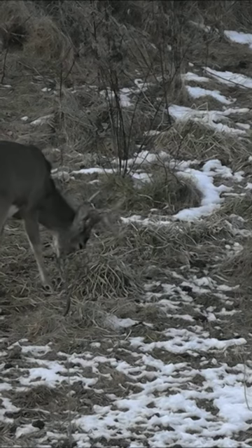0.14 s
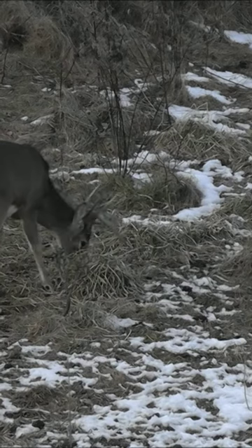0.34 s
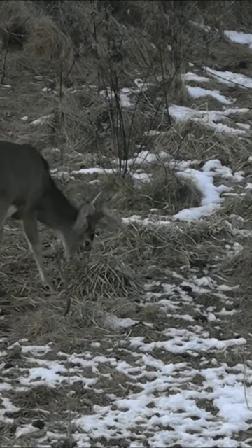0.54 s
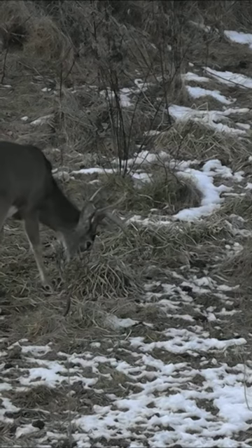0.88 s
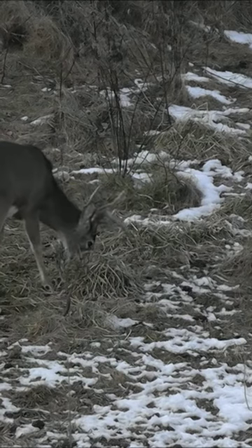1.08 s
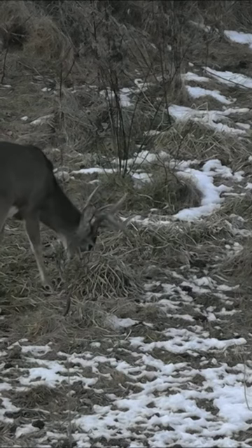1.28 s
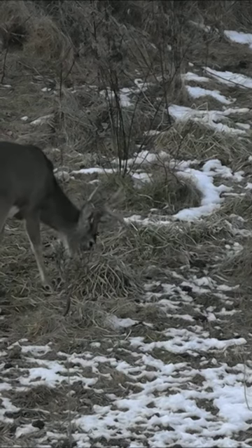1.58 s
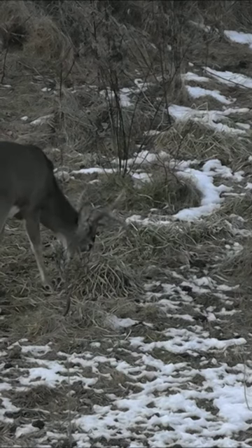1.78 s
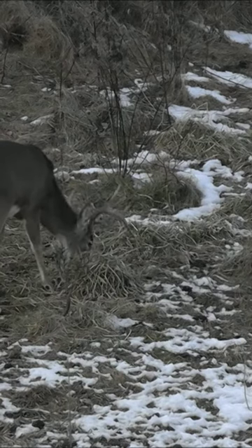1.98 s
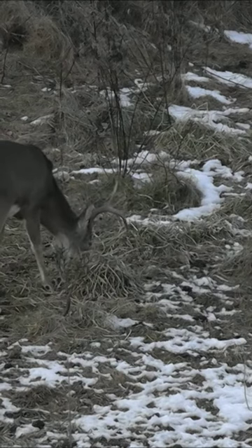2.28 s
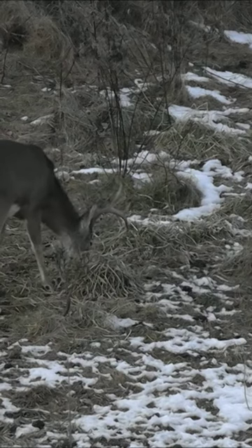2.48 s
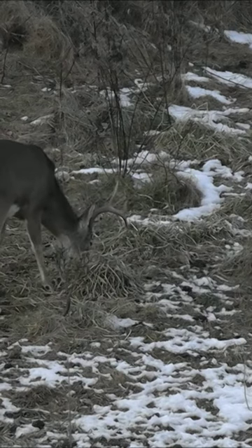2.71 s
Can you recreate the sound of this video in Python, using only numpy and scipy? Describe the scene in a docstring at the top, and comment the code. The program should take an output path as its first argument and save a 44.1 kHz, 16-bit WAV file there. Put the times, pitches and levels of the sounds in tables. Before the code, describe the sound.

A bow release snaps once, dry and close, at about 2.8 seconds, with a quick low limb thump and faint rebound. Before it, a quiet open field: a far engine drones low on the left, swelling unevenly after 0.8, over soft air rumble, steady hiss and thin whine. Tiny gear ticks come at 0.12 and 0.6, a soft knock at 1.4, a duller tick at 1.7, another knock at 2.3.

```python
"""A quiet winter field: from the start a far engine drones to the left over low air noise and a faint
equipment hiss and whine. Small ticks and knocks of bow gear close to the microphone follow, then the
release lets go with one dry snap, a thump of the limbs and a faint rebound. The engine and the whine are
summed sines, air and hiss are shaped noise, and ticks, knocks and snap are decaying modes with noise."""
import sys
import numpy as np
from scipy import signal
from scipy.fft import rfft, irfft
from scipy.io import wavfile
from scipy.ndimage import uniform_filter1d

SR = 44100
rng = np.random.default_rng(int(sys.argv[2]) if len(sys.argv) > 2 else 0)


def store_wav(level_fs):
    """Save 16-bit WAV to argv[1]."""
    pcm = np.round(np.clip(np.atleast_2d(level_fs), -1, 1) * 32767)
    wavfile.write(sys.argv[1], SR, pcm.T.astype(np.int16))


N = 125685


def undb(db):
    """Decibel law: 20 dB is a tenfold amplitude."""
    return 10 ** (np.asarray(db) / 20)


def clock():
    """Sampling: the time of every sample in seconds."""
    return np.arange(N) / SR


def curve(rows, column=1):
    """Linear interpolation: one column of a table against time."""
    rows = np.array(rows)
    return np.interp(clock(), rows[:, 0], rows[:, column])


def between(points, f):
    """Logarithmic frequency scale: (Hz, value) points joined by straight lines over log frequency."""
    hz, value = np.array(points).T
    return np.interp(np.log(f), np.log(hz), value)


def pan(db):
    """Level difference between the ears: left over right in dB, as gains with a mean of one."""
    gains = undb(np.array([[db], [-db]]) / 2)
    return gains / gains.mean()


def walk(rate):
    """Low-passed random process: random steps, rate per second, smoothed twice to unit spread."""
    hold = int(SR / rate)
    steps = np.repeat(rng.standard_normal(N // hold + 1), hold)
    smooth = uniform_filter1d(uniform_filter1d(steps, hold), hold)[:N]
    return smooth / smooth.std()


def peak(hz, width):
    """Resonance: gain against frequency, falling as the inverse square far from the centre."""
    return lambda f: 1 / (1 + ((f - hz) / width * np.sqrt(2)) ** 2)


def colour(points, dips=()):
    """Spectral shaping: gain against frequency through (Hz, dB) points, less any narrow dips."""
    def gain(f):
        shape = undb(between(points, f))
        for hz, width, depth in dips:
            shape = shape * (1 - depth * peak(hz, width)(f))
        return shape
    return gain


def noise(gain, likeness):
    """Interaural coherence: unit-level shaped noise, a shared part mixed with one part per ear."""
    f = np.fft.rfftfreq(N, 1 / SR) + 1  # 1 Hz up, to keep the logarithm finite
    coherence = likeness if np.isscalar(likeness) else between(likeness, f)
    coherence = np.clip(coherence, 0, 1)
    spectra = rfft(rng.standard_normal((3, N))) * gain(f)
    shared, separate = spectra[0], spectra[1:]
    out = irfft(np.sqrt(coherence) * shared + np.sqrt(1 - coherence) * separate, N)
    return out / out.std()


def fade(start, t60, rise):
    """Exponential damping: a quick rise, then a decay of 60 dB in t60 seconds."""
    t = np.maximum(clock() - start, 0)
    return (1 - np.exp(-t / rise)) * np.exp(-np.log(1000) * t / t60)


def ring(start, hz, t60, rise):
    """Damped oscillation: one struck mode as a decaying sine."""
    return fade(start, t60, rise) * np.sin(2 * np.pi * hz * (clock() - start))


# Engine speed. Each row: time in seconds, firing rate in Hz before the wander.
FIRING_RATE = [(0, 74.63), (.75, 74.81), (1.1, 75.06), (1.5, 74.34), (1.75, 74.34), (2.85, 74.05)]
# Swells of the drone. Each row: time in seconds, then levels in dB, before trim and flutter,
# of harmonics 2, 3, 5, 6 and 8.
DRONE_LEVELS = [(0, -63, -66.5, -67.5, -65.5, -73), (.3, -67.5, -65, -67.5, -62, -72),
                (.45, -60, -65.5, -65, -63, -75), (.6, -67.5, -64.5, -72.5, -71, -68),
                (.8, -63, -55.5, -65.5, -79, -73), (.95, -56.5, -55.5, -58, -60.5, -66.5),
                (1.2, -57.5, -54.5, -60, -68.5, -73), (1.42, -57, -51, -60, -67.5, -83),
                (1.65, -54, -53, -63, -64, -85), (1.78, -59.5, -51, -72, -70, -78),
                (1.95, -59.5, -54, -61, -67.5, -80), (2.15, -59.5, -51, -57, -66.5, -67.5),
                (2.45, -58, -52, -56, -63, -67.5), (2.85, -59, -55, -58.5, -65.5, -71)]
# Leading harmonics. Each row: multiple of the firing rate, trim in dB, left over right in dB, flutter in dB.
LEADING_HARMONICS = [(2, 2, 10, 0.55), (3, 1, 9.5, 0.62), (5, 1.5, 6, 1.34), (6, -.5, 5.5, 1.8),
                     (8, 1.5, 17, 1)]
# Weak harmonics. Each row: multiple of the firing rate, level in dB relative to the untrimmed
# third harmonic, left over right in dB.
WEAK_HARMONICS = [(4, -14, 4.5), (7, -17.5, 11.5), (10, -28.5, 26)]


def engine(wander=0.002113, weak_flutter_db=2):
    """Harmonic series: multiples of the firing rate, each swelling and fading on its way over the field."""
    rate = curve(FIRING_RATE) * (1 + wander * walk(14))  # wander is a fraction of the rate
    turn = 2 * np.pi * np.cumsum(rate) / SR

    def tone(multiple):
        return np.sqrt(2) * np.sin(multiple * turn + rng.uniform(0, 2 * np.pi))

    out = 0
    for column, (multiple, trim_db, side_db, flutter_db) in enumerate(LEADING_HARMONICS, start=1):
        level_db = curve(DRONE_LEVELS, column) + trim_db + flutter_db * walk(16)
        out = out + pan(side_db) * tone(multiple) * undb(level_db)
    third_db = curve(DRONE_LEVELS, column=2)
    for multiple, relative_db, side_db in WEAK_HARMONICS:
        level_db = third_db + relative_db + weak_flutter_db * walk(7.81)
        out = out + pan(side_db) * tone(multiple) * undb(level_db)
    return out


# Spectrum of the low air noise. Each row: frequency in Hz, relative density in dB per Hz.
AIR_SPECTRUM = [(20, -36), (35, -20), (60, -10), (110, 0.5), (160, 0.5), (260, -3.5), (420, -5),
                (620, -9.5), (850, -10.5), (1200, -20), (1800, -37), (3000, -47)]
# Likeness of the air noise at the two ears. Each row: frequency in Hz, coherence from 0 to 1.
AIR_COHERENCE = [(60, 0.62), (160, 0.85), (350, 0.42), (650, 0.52), (1000, 0.11), (1500, 0.3)]
# Course of the air noise. Each row: time in seconds, level in dB before panning and flutter.
AIR_COURSE = [(0, -54), (.6, -54.5), (1.1, -56), (1.9, -55), (2.3, -54.5), (2.85, -55)]


def air():
    """Partly coherent noise: the low, wide rumble of the open country, stronger on the left."""
    level_db = curve(AIR_COURSE) + 0.88 * walk(8.28)
    return noise(colour(AIR_SPECTRUM), AIR_COHERENCE) * pan(db=5) * undb(level_db)


# Spectrum of the hiss. Each row: frequency in Hz, relative density in dB per Hz.
HISS_SPECTRUM = [(500, -1.5), (1500, 10), (2300, 5.5), (4000, 1.5), (5800, -1.5), (7200, 1.5), (9000, 0),
                 (15000, -2.5)]
# Narrow dips in the hiss. Each row: frequency in Hz, width in Hz, depth from 0 to 1.
HISS_NOTCHES = [(2406, 77, 0.9), (3025, 94, 0.46)]
# Likeness of the hiss at the two ears. Each row: frequency in Hz, coherence from 0 to 1.
HISS_COHERENCE = [(1500, 0.11), (3000, 0.41), (5000, 1), (7000, 0.74), (10000, 0.42), (15000, 0.55)]
# Resonances in the hiss. Each row: frequency in Hz, width in Hz, level in dB before the swell, share of it.
HISS_RESONANCES = [(1950, 125, -85, 1.1), (2614, 134, -82, 0.76), (3270, 177, -81.5, 0.8),
                   (4146, 99, -93, 2.4), (4990, 230, -87, 0.72), (6070, 210, -91.5, .3),
                   (6900, 810, -83, .5)]
# Swell of those resonances. Each row: time in seconds, change in dB for a share of one.
RESONANCE_SWELL = [(0, 1.5), (.52, 4), (.7, -2.5), (2.85, -0.5)]
# Steady whine. Each row: frequency in Hz, level in dB before the flutter.
WHINE_TONES = [(1694, -87.5), (1932, -90.5), (3622, -91), (4185, -101), (7870, -100)]
# Highest clear whine tone. Each row: time in seconds, level in dB before the flutter.
WHISTLE_COURSE = [(0, -98), (1.1, -94), (1.45, -85), (2.0, -85), (2.3, -91), (2.85, -90)]
HISS_DB, WHISTLE_HZ = -70, 5433


def equipment():
    """Filtered noise and pure tones: a steady hiss with a few swelling resonances and a thin whine."""
    out = noise(colour(HISS_SPECTRUM, HISS_NOTCHES), HISS_COHERENCE) * undb(HISS_DB)
    for hz, width, db, share in HISS_RESONANCES:
        level_db = db + share * curve(RESONANCE_SWELL) + 1.4 * walk(20)
        out = out + noise(peak(hz, width), likeness=0.86) * undb(level_db)

    def tone(hz):
        return np.sqrt(2) * np.sin(2 * np.pi * hz * clock()) * undb(1.2 * walk(8.0))

    whine = sum(tone(hz) * undb(db) for hz, db in WHINE_TONES)
    whistle = tone(WHISTLE_HZ) * undb(curve(WHISTLE_COURSE))
    return pan(db=-0.5) * (out + whine + whistle)


# Small ticks, the last just ahead of the snap. Each row: start in seconds, pitch in Hz, level in dB,
# t60 in seconds, level of the bright edge in dB before its envelope.
TICK_EVENTS = [(0.1210, 4920, -45.5, 0.0058, -59.5), (.1270, 4950, -59, .008, -78),
               (.619, 13500, -59.5, .006, -63), (1.692, 1130, -33, 0.0087, -68),
               (2.8026, 6090, -51, 0.0053, -72)]
# Bright edge of a tick. Each row: frequency in Hz, relative density in dB per Hz.
EDGE_SPECTRUM = [(3600, -25), (4400, 3), (7000, 0), (15000, -2)]
TICK_RISE_CYCLES, TICK_EDGE_T60_S = 1.2, 0.009


def ticks():
    """Heavily damped mode: each tick is a short ring at one pitch with a bright edge of noise."""
    out = 0
    for start, hz, db, t60, edge_db in TICK_EVENTS:
        body = ring(start, hz, t60, rise=TICK_RISE_CYCLES / hz)
        edge = noise(colour(EDGE_SPECTRUM), likeness=0.63) * fade(start, TICK_EDGE_T60_S, rise=0.0001)
        out = out + undb(db) * body + undb(edge_db) * edge
    return out


# Knocks on the bow gear; the loudest is the release, with a faint rebound. Each row: start in seconds,
# gain in dB, left over right in dB, brightness in dB per octave, low-pass corner in Hz.
KNOCK_EVENTS = [(1.4084, -52, 8, 3, 2700), (2.3209, -47, 2, 2.5, 4300), (2.8036, -34.5, 3, 0.7, 8040),
                (2.8106, -58, 1, 5, 5500)]
# Modes of the gear. Each row: frequency in Hz, level in dB before the brightness tilt, t60 in seconds.
GEAR_MODES = [(803, 1.5, 0.027), (970, -13.5, 0.044), (1406, -9.5, 0.019), (1550, -18, 0.028),
              (2130, -13, 0.018), (2602, -17.5, 0.02), (3373, -16, .015), (3620, -18, .014),
              (4600, -16.5, 0.010), (6000, -10.5, 0.0048), (7600, -22, .006)]
# Thump of the limbs after the release.
THUMP_S, THUMP_HZ, THUMP_T60_S, THUMP_DB = 2.8095, 285, 0.04, -36
SCATTER_T60_S = 0.055


def bow(crack_db=-24, scatter_db=-29):
    """Modal excitation: knocks ring the gear with crack and scatter, dulled by contact; the limbs thump."""
    out = ring(THUMP_S, THUMP_HZ, THUMP_T60_S, rise=0.0013) * undb(THUMP_DB) * pan(db=3)
    lowest_hz = GEAR_MODES[0][0]
    for start, db, side_db, bright, dull_hz in KNOCK_EVENTS:
        def tilt(f):
            return undb(bright * np.log2(f / lowest_hz))

        def scatter_gain(f):
            return tilt(f) * peak(hz=1500, width=4000)(f)

        body = sum(ring(start, hz, t60, rise=0.00022) * undb(mode_db) * tilt(hz)
                   for hz, mode_db, t60 in GEAR_MODES)
        crack = noise(tilt, likeness=0.56) * fade(start, t60=0.01, rise=0.0002)
        scatter = noise(scatter_gain, likeness=0.47) * fade(start, SCATTER_T60_S, rise=0.0015)
        knock = body + undb(crack_db) * crack + undb(scatter_db) * scatter
        contact = signal.butter(8, dull_hz, fs=SR, output="sos")
        out = out + pan(side_db) * undb(db) * signal.sosfilt(contact, knock)
    return out


def scene():
    """Superposition: the field with the bow in front."""
    return engine() + air() + equipment() + ticks() + bow()


def record(dry, top_hz=15600):
    """Band limiting: the recorder cuts the top with a steep low-pass."""
    low_pass = signal.ellip(10, 0.1, 70, top_hz, fs=SR, output="sos")  # 0.1 dB ripple, 70 dB stop band
    return signal.sosfilt(low_pass, dry)


dry = scene()
out = record(dry)
store_wav(out)
```